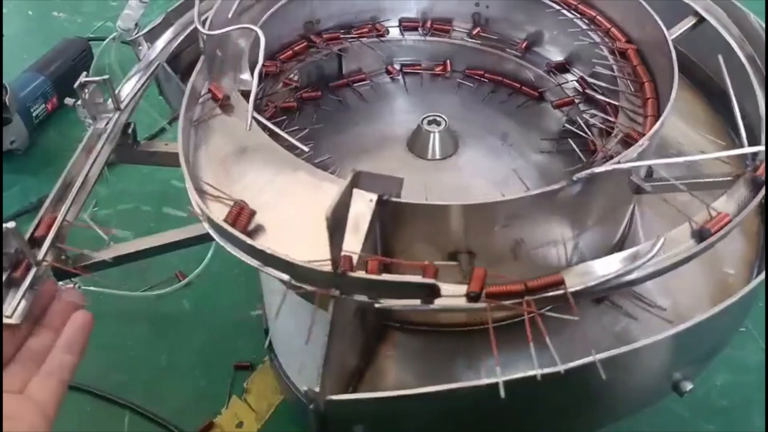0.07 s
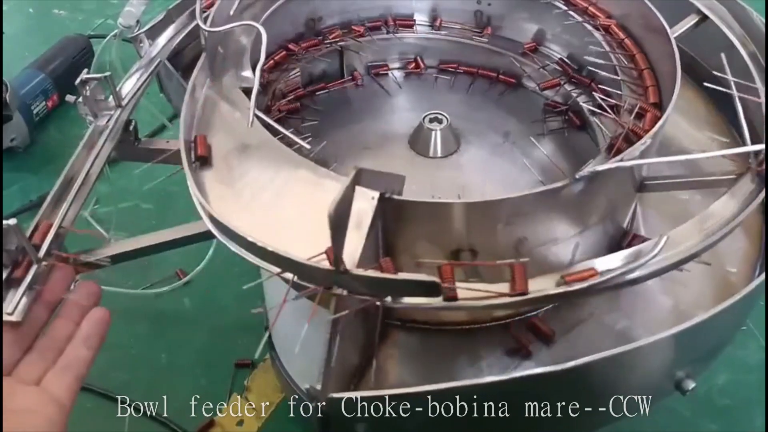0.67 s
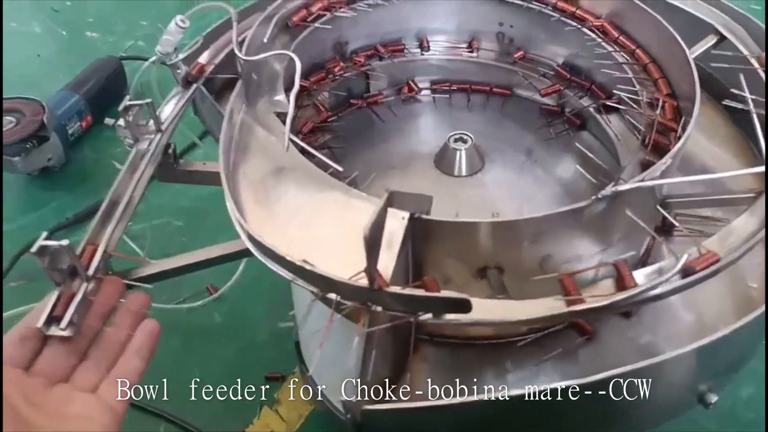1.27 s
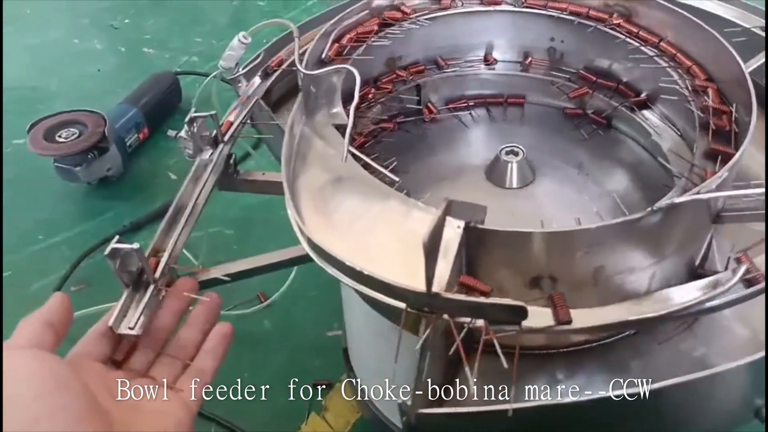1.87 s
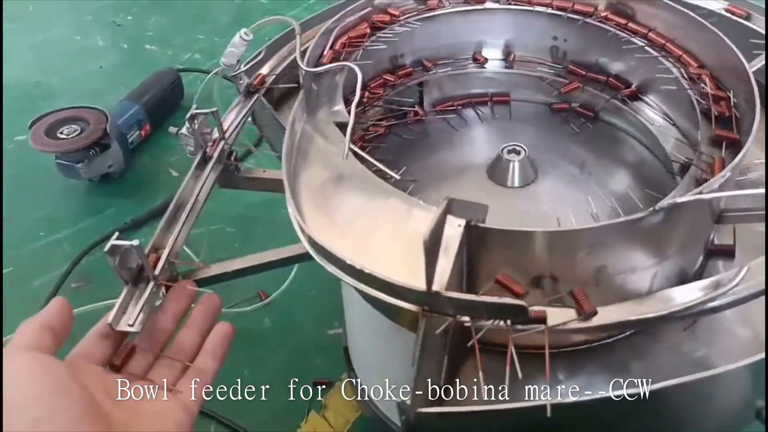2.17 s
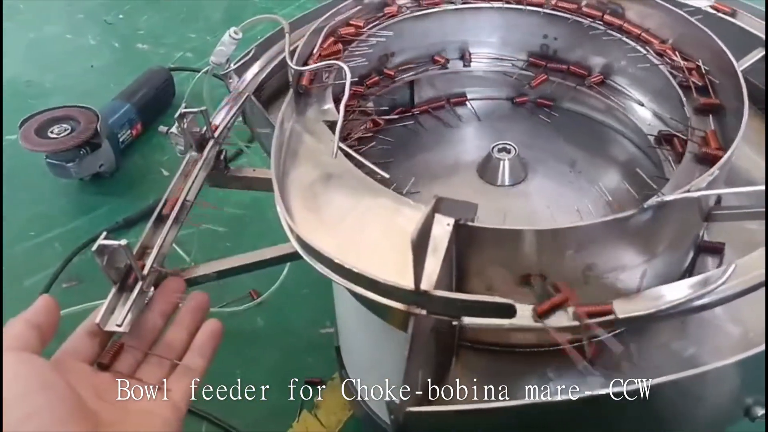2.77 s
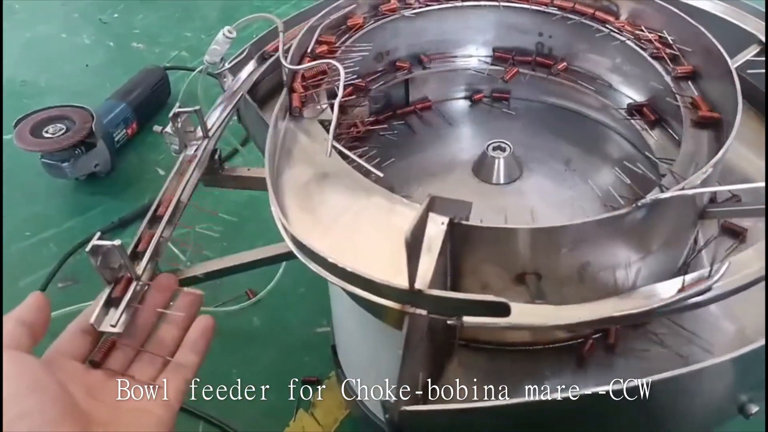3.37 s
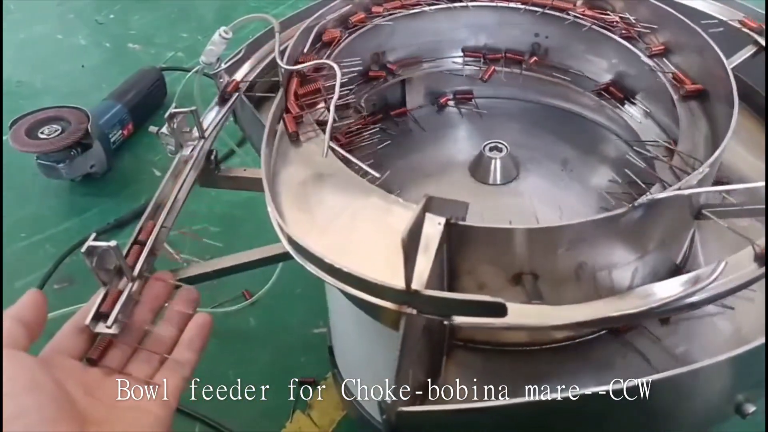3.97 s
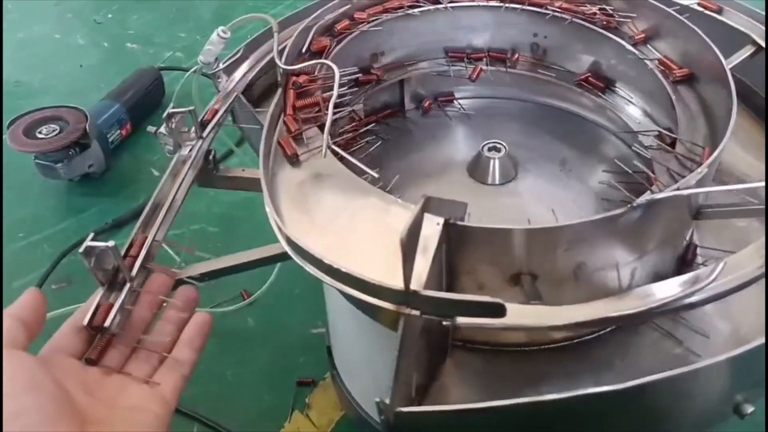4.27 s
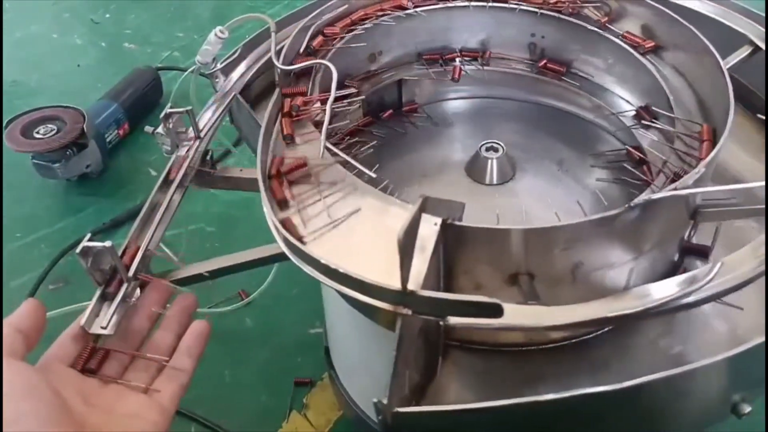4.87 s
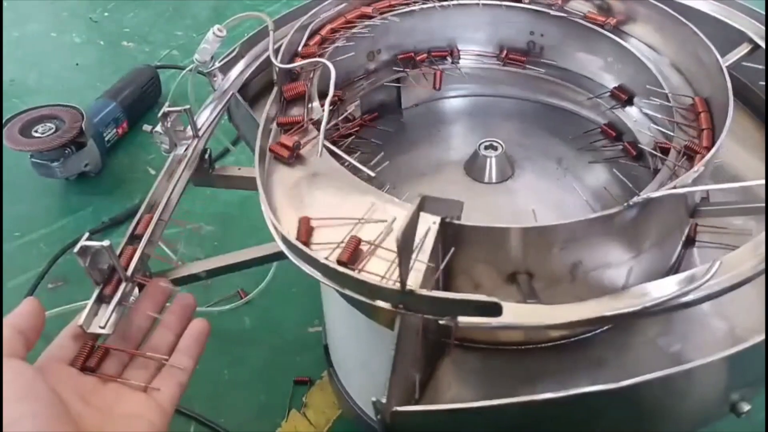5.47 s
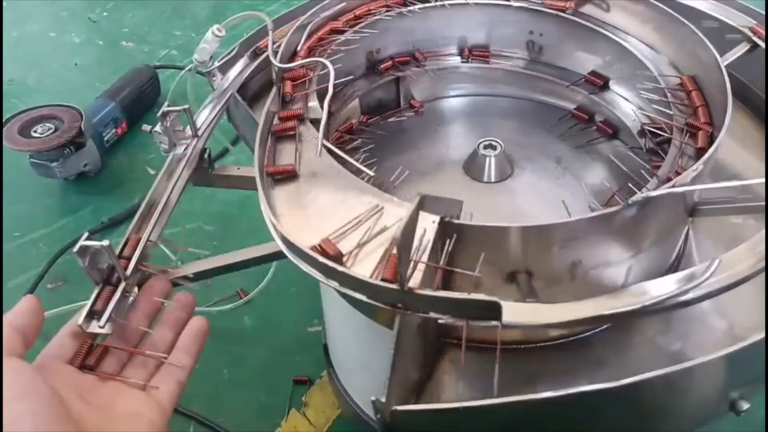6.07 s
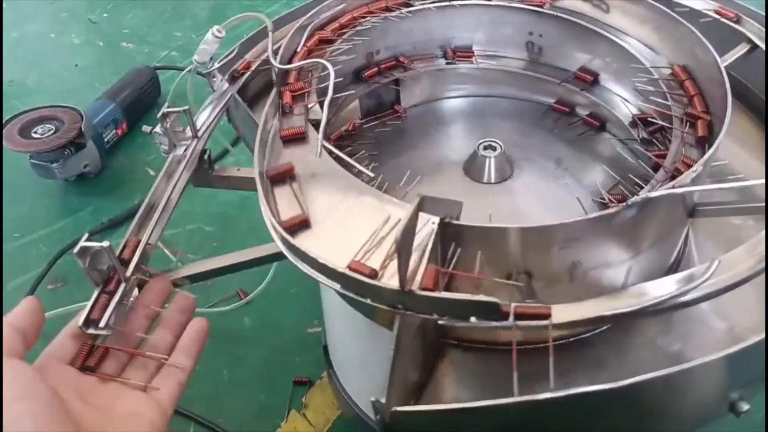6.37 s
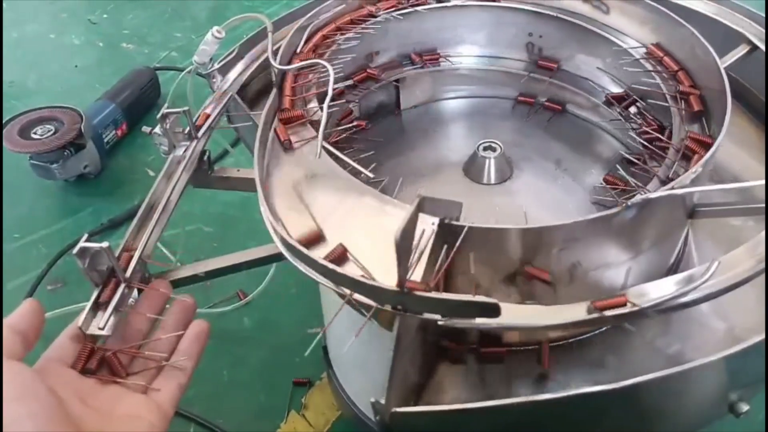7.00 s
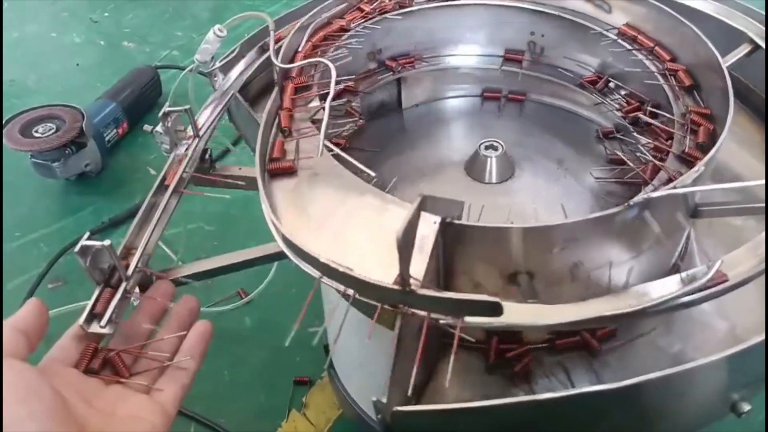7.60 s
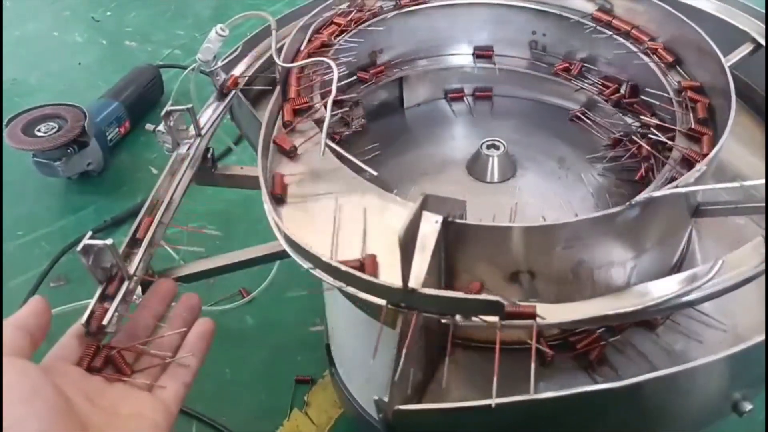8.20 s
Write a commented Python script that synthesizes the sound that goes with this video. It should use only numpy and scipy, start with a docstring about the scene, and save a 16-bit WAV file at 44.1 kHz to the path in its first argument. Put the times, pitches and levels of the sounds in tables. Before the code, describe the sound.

Close to a workshop feeder, many small metal coils chatter continuously around a shaking steel bowl, with thin high tones ringing out and a low motor hum underneath. Scattered clinks and soft knocks mark falling parts, bunching together about three seconds in. A soft hollow tone then rises and fades, and more clinks follow. The rattle often thins for an instant but keeps going.

```python
"""A vibrating bowl feeder rattles small wire-legged coils in a workshop, heard from just above its rim.
The humming drive tosses the coils once a cycle, and their landings ring the steel bowl into a dense,
bright rattle in which a few tones sing out. Now and then a coil drops off the track with a clink or
knocks on the wall. Midway a hollow drone swells. The sound often thins for an instant."""
import sys
import numpy as np
from scipy import signal
from scipy.fft import rfft, irfft, next_fast_len
from scipy.io import wavfile
from scipy.ndimage import uniform_filter1d

SR = 44100
rng = np.random.default_rng(int(sys.argv[2]) if len(sys.argv) > 2 else 0)


def store_pcm(level_fs):
    """Save levels as 16-bit WAV."""
    pcm = np.round(np.clip(level_fs, -1, 1) * 32767).astype(np.int16)
    wavfile.write(sys.argv[1], SR, np.atleast_2d(pcm).T)


N = 363384
T = np.arange(N) / SR
DRIVE_HZ = 111.26  # how often the bowl shakes

# how hard the coils jostle over time: time_s, level_db, extra_treble_db, extra_boom_db
JOSTLING = [(0.1, -21, 3.5, 0), (0.5, -18.5, 0.5, -2.5), (0.9, -20, 2, -1.5), (1.2, -19, 0.5, -0.5),
            (2.0, -20.5, -0.4, -1), (2.7, -19.5, -0.7, -1.5), (3.3, -21.5, 3.5, 1.5),
            (4.1, -18, -0.5, -1.5), (4.6, -21, 2.5, 1.5), (5.3, -19.5, 1.5, -1), (6.0, -20.5, 2, 0.5),
            (6.4, -18.5, 2, -1), (6.6, -20, 3, 1.5), (7.0, -19, 0.5, -0.5), (7.7, -18.5, 1, -1.5),
            (7.9, -19.5, -0.5, -3), (8.2, -19, 2, 0)]
# ringing tones of the bowl and its track, plus two faint low hum tones at 200 and 222 Hz:
# pitch_hz, nominal_width_hz, relative_db
RING_AND_HUM_TONES = [(200, 8, -52), (222, 8, -55), (412, 19, -36.8), (460, 9, -50), (654, 16, -44.8),
                      (900, 26, -46.1), (1255, 22, -45.3), (1463, 22, -45.6), (1610, 28, -42.5),
                      (1762, 36, -41.3), (1865, 40, -45), (2060, 24, -42), (2155, 20, -44.5),
                      (2336, 14, -42.5), (2575, 11, -35.3), (2636, 20, -36.8), (2840, 30, -41),
                      (2905, 18, -42.1), (3059, 17, -34.2), (3185, 25, -41), (3305, 25, -40.5),
                      (3378, 16, -39.5), (3594, 18, -38.3), (3745, 45, -35.8), (3808, 45, -35.3),
                      (3873, 40, -39), (3935, 19, -33.3), (3972, 22, -38.5), (4131, 8, -42.5),
                      (4340, 30, -42), (4393, 32, -39.8), (4440, 25, -41), (4530, 15, -46),
                      (4655, 20, -46.5), (5112, 31, -45.0), (5570, 30, -49.5), (5880, 36, -46.5),
                      (6445, 189, -41), (8473, 44, -44), (9084, 137, -45.9), (10222, 60, -40),
                      (10945, 60, -39), (11130, 150, -37), (11552, 115, -35.3), (11865, 400, -35.3),
                      (14649, 64, -50)]
# tone colour of the steel's many weaker modes (natural tones): frequency_hz, relative_db
WEAK_MODE_COLOUR = [(25, -79), (60, -75), (125, -63.5), (170, -72), (330, -63.5), (560, -72), (790, -71),
                    (1060, -68), (1800, -65.5), (2250, -65), (2750, -57.5), (3400, -59), (4600, -63),
                    (7200, -69.5), (12000, -68), (15000, -73.5)]
# modes that sing out for a while: peak_time_s, half_length_s, pitch_hz, nominal_width_hz, level_db
SINGING_MODES = [(.5, 0.3, 10222, 34, -36), (.96, 0.08, 10222, 34, -33.5), (1.33, .11, 4395, 18, -34),
                 (5.3, .09, 2573, 7, -30.5), (5.7, .16, 2576, 7, -36), (6.3, 1.5, 10260, 110, -42)]
# coils that drop off the track: start_s, peak_db, pitch_hz, extra_treble_db, track_relative_db
COIL_DROPS = [(0.5661, -9, 4130, 1, -12), (1.134, -11.5, 4150, 0, -12), (2.634, -4.3, 4120, 0, -12),
              (2.7911, -9, 4100, -4, -10), (2.9048, -6, 4400, 2, -14), (2.952, -11.5, 4130, 0, -14),
              (2.9754, -7, 4480, 4, -14), (3.2335, -5, 4530, 0, -12), (4.2757, -7.5, 4340, 7, -14),
              (4.49, -11, 4130, 2, -14), (5.5762, -12, 6670, 4, -12), (6.4117, -11, 4400, 4, -12),
              (6.94, -12, 5120, 1, 4.5), (7.4418, -6.5, 5100, 0, -14), (7.456, -6, 4130, -1, -12)]
# tone colour of a hard hit on the steel: frequency_hz, relative_db
CLINK_COLOUR = [(150, 1), (700, -8), (1500, -5.5), (2800, 8), (4500, 6), (6200, 7.5), (7600, -4), (9300, 6),
                (10500, 8.5), (12000, 7), (15000, -3)]
# modes of the thin track when a coil hits its edge: pitch_hz, relative_db, ring_time_s
TRACK_MODES = [(666, -9, .07), (1287, -3, .07), (1620, -3, .07), (3060, -3, .08), (4124, -1, .1),
               (5120, -2, .08), (5889, -3, .08), (6083, -5, .08), (6772, -6, .09), (8985, -7, .09),
               (10230, -5, .09), (11490, -1, .08)]
# coil bodies bumping the wall: start_s, peak_db, pitch_hz
WALL_KNOCKS = [(1.204, -23, 1570), (1.388, -23, 1350), (2.976, -17, 1570), (3.233, -21, 880),
               (4.275, -26, 630), (4.528, -24, 1010), (4.799, -28, 820), (5.213, -24, 920),
               (5.765, -19.5, 876), (7.309, -22, 1150), (7.456, -20, 2040)]
# tone colour of a dull knock: frequency_hz, relative_db
KNOCK_COLOUR = [(80, -8), (250, -8), (800, -4), (1700, -4), (3000, -6), (12000, -40)]
# tones of the hollow drone: peak_time_s, half_length_s, pitch_hz, nominal_width_hz, level_db
DRONE_TONES = [(4.52, 0.32, 339, 37, -36), (4.44, 0.093, 736, 25, -35), (4.06, 0.077, 785, 31, -41),
               (5.3, 0.16, 282, 40, -43)]
# instants when the sound thins: middle_s, length_s, depth_db
BRIEF_DIPS = [(.361, .014, -9), (.4, .028, -8), (.549, .012, -7), (.65, .015, -7), (.737, .012, -6),
              (.783, .046, -45), (1.083, .018, -9), (1.112, .02, -5), (1.295, .014, -11),
              (1.659, .015, -13), (1.891, .012, -10), (1.956, .013, -14), (1.998, .014, -15),
              (2.075, .026, -36), (2.253, .048, -14), (2.363, .013, -13), (2.554, .013, -11),
              (2.724, .017, -13), (3.023, .012, -10), (3.13, .022, -12), (3.224, .016, -4),
              (3.27, .026, -32), (3.315, .01, -7), (3.577, .015, -11), (3.749, .046, -45),
              (4.048, .013, -7), (4.132, .014, -12), (4.624, .017, -14), (4.664, .02, -14),
              (4.793, .013, -10), (4.885, .014, -5), (5.037, .022, -6), (5.396, .016, -6),
              (5.616, .018, -7), (6.044, .017, -6), (6.284, .014, -11), (6.539, .026, -6), (6.985, .05, -4),
              (7.257, .044, -17), (7.58, .02, -6), (7.8, .015, -13), (7.93, .019, -13), (7.972, .011, -8),
              (7.993, .011, -9), (8.037, .014, -13), (8.186, .019, -8)]


def bowl_rattle(heap_count=10):
    """Heaps of coils ring the bowl, each at its own spot; two faint low hum tones lie underneath."""
    heaps = np.array([landings() + undb(-6.5) * tumbles() for _ in range(heap_count)])
    clatter = sum(signal.oaconvolve(heap, steel_strike(ring_s=.06, tick=.54))[:N] for heap in heaps)
    out = undb(-23) * unit(colour(clatter, WEAK_MODE_COLOUR))
    for hz, width, db in RING_AND_HUM_TONES:
        # each tone gets its own mix of the heaps
        push = rng.standard_normal(heap_count) @ heaps
        ring = unit(resonate(push, hz, .85 * width))
        # a wide swing throws the coils clear, which keeps the bowl's ring fairly even
        swing = np.sqrt(uniform_filter1d(ring ** 2, SR // 6) + .01)
        # each tone comes and goes a little
        drift = undb(1.5 * wander(rate_hz=9))
        out += undb(db - .95) * unit(drift * ring / np.sqrt(swing))
    return out


def landings(coils=6, scatter_cycles=.29, uneven_db=5.5, shift_db=1.5):
    """Each coil in a shifting heap lands once a drive cycle, early or late, hard or soft."""
    cycle = np.arange(int(N / SR * DRIVE_HZ))[:, None]
    late, force = rng.standard_normal((2, len(cycle), coils))
    at = ((cycle + scatter_cycles * late) / DRIVE_HZ * SR).astype(int) % N
    push = undb(uneven_db * np.clip(force, -2, 2)) * rng.choice([-1, 1], force.shape)
    taps = np.bincount(at.ravel(), push.ravel(), N)
    return unit(taps * undb(shift_db * wander(rate_hz=30)))


def tumbles(count=45):
    """Now and then a coil tips over, lands hard and bounces on for two more drive cycles."""
    out = np.zeros(N + SR)
    for when, force in rng.random((count, 2)):
        for bounce in range(3):
            out[int(when * N + bounce * SR / DRIVE_HZ)] += undb(6 * force - 2 * bounce)
    return unit(out[:N])


def jostle(rattle):
    """How hard the coils jostle sets the level; wire legs add treble, heavy bodies add boom."""
    level_db, legs_db, boom_db = curves(JOSTLING)
    legs, boom = band(rattle, 5900, "high"), band(rattle, 1700, "low")
    # few bodies reach the wall at a time, so the boom comes in lumps
    lumps_db = boom_db + wander(rate_hz=26)
    jingle_db = legs_db + .5 * wander(rate_hz=35)
    shaped = rattle + legs * (undb(jingle_db) - 1) + boom * (undb(lumps_db) - 1)
    return unit(shaped) * undb(level_db)


def falling_coils():
    """Falling coils clink brightly and ring the track; their bodies knock dully on the wall."""
    clinks = [(s, db, hz, treble_db) for s, db, hz, treble_db, _ in COIL_DROPS]
    knocks = [(s, db, hz, 0) for s, db, hz in WALL_KNOCKS]
    return hits(clinks, CLINK_COLOUR, ring_db=-9) + track_ring() + hits(knocks, KNOCK_COLOUR, ring_db=-6)


def hits(table, tone_colour, ring_db):
    """For each row, a coil hits the steel and bounces once, more softly."""
    out = np.zeros(N + SR)
    lead = 256  # samples of room for the filters ahead of the hit
    for start_s, peak_db, hz, treble_db in table:
        hit = np.zeros(SR // 3)
        for delay_s, gain in [(0, 1), (rng.uniform(.0022, .007), .55)]:
            ring = steel_strike(ring_s=.11, tick=.065)
            at = lead + int(delay_s * SR)
            hit[at:at + len(ring)] += gain * ring
        hit = unit(colour(hit, tone_colour))
        # the struck spot rings at its own pitch and one out-of-tune overtone
        hit += undb(ring_db) * (unit(resonate(hit, hz, 31)) + .5 * unit(resonate(hit, 1.9 * hz, 82)))
        hit += band(hit, 12000, "high") * (undb(treble_db) - 1)
        at = int(start_s * SR) - lead
        out[at:at + len(hit)] += hit * undb(peak_db) / np.abs(hit).max()
    return out[:N]


def steel_strike(ring_s, tick, size=8192):
    """Struck steel gives a tick, then countless modes fade together, by 60 dB in ring_s."""
    decay = undb(-60 * T[:size] / ring_s)
    ring = rng.standard_normal(size) * decay
    ring /= np.linalg.norm(ring)
    ring[0] += tick
    return ring / np.linalg.norm(ring)


def track_ring(rise_s=.009):
    """Each falling coil sets the thin track ringing in a few clear tones."""
    age = T[:SR // 3]
    ring = sum(undb(db - 60 * age / ring_s) * np.sin(2 * np.pi * (hz * age + rng.random()))
               for hz, db, ring_s in TRACK_MODES)
    ring *= np.minimum(age / rise_s, 1)
    blows = np.zeros(N)
    for start_s, peak_db, _, _, track_db in COIL_DROPS:
        blows[int(start_s * SR)] = undb(peak_db + track_db)
    return signal.oaconvolve(blows, ring / np.abs(ring).max())[:N]


def swelling_tones(table):
    """Narrow resonances, driven fairly evenly by noise, rise and fade."""
    out = 0
    for peak_s, half_length_s, hz, width, db in table:
        tone = resonate(rng.standard_normal(N), hz, 1.6 * width)
        tone = resonate(tone, hz, 1.6 * width)  # a second pass makes it purer
        loudness = np.sqrt(uniform_filter1d(unit(tone) ** 2, SR // 8) + .05)
        swell = np.exp(-.5 * ((T - peak_s) / half_length_s) ** 2)
        out += undb(db) * swell * unit(tone / loudness)
    return out


def drive_hum(level_db=-34, octave_relative_db=-35):
    """The bowl swings on its springs, making an almost pure tone with a faint octave above."""
    phase = 2 * np.pi * DRIVE_HZ * T + .03 * wander(rate_hz=10)
    tone = np.sin(phase) + undb(octave_relative_db) * np.sin(2 * phase)
    return undb(level_db + .15 * wander(rate_hz=6.5)) * tone


def suppress_noise(x, strength=.22):
    """A mild noise suppressor favours tones that stand above their neighbours in pitch."""
    def rule(power):
        neighbours = np.abs(uniform_filter1d(power, 25, axis=0))
        gain = (power / neighbours) ** strength
        return gain * np.sqrt(power.sum(0) / (power * gain ** 2).sum(0))  # same total power
    return scale_tones(x, rule)


def thin_briefly(x, stand_out_db=4.4, lift_db=2, neighbour_share=.3):
    """The sound dips for an instant, except for its clearest tones, which get a small lift."""
    def rule(power):
        lasting = np.abs(uniform_filter1d(power, 5, axis=1)) + 1e-18
        neighbours = np.abs(uniform_filter1d(lasting, 41, axis=0))
        # a tone stays if it stands above a blend of its neighbours and the whole sound
        usual = neighbours ** neighbour_share * lasting.mean(0) ** (1 - neighbour_share)
        threshold = undb(stand_out_db) ** 2 * usual
        return undb(lift_db) / (1 + (threshold / lasting) ** 8)
    dip_db = 0
    for middle_s, length_s, depth_db in BRIEF_DIPS:
        distance = np.minimum(2 * np.abs(T - middle_s) / length_s, 2)
        dip_db += depth_db * np.exp(-distance ** 4)
    untouched = undb(dip_db)
    return x * untouched + scale_tones(x, rule) * (1 - untouched)


def scale_tones(x, rule):
    """Turn each frequency above 250 Hz up or down, moment by moment, by a rule on its power."""
    hz, _, spectrum = signal.stft(x, SR, nperseg=1024, noverlap=768)
    gain = np.where(hz[:, None] > 250, rule(np.abs(spectrum) ** 2 + 1e-18), 1)
    return signal.istft(spectrum * gain, SR, nperseg=1024, noverlap=768)[1][:N]


def resonate(x, hz, width_hz):
    """Ring at one pitch; the narrower the width, the longer it rings."""
    return signal.lfilter(*signal.iirpeak(hz, hz / width_hz, fs=SR), x + 1e-18)


def colour(x, points):
    """Shape the tone with a curve through (frequency_hz, relative_db) points."""
    hz, db = np.transpose(points)
    size = next_fast_len(len(x))
    frequencies = np.maximum(np.fft.rfftfreq(size, 1 / SR), 1)
    gain = undb(np.interp(np.log(frequencies), np.log(hz), db))
    return irfft(rfft(x, size) * gain, size)[:len(x)]


def band(x, hz, kind):
    """Gently keep the "low" or "high" side of a frequency, without delay."""
    return signal.sosfiltfilt(signal.butter(2, hz, kind, fs=SR, output="sos"), x)


def wander(rate_hz):
    """A smooth random drift with a typical size of one."""
    step = int(SR / rate_hz)
    held = rng.standard_normal(2000)[np.arange(N) // step % 2000]
    return unit(uniform_filter1d(held, step))


def curves(table):
    """Join the rows of a time table with straight lines, one value a sample."""
    times, *columns = np.transpose(table)
    return [np.interp(T, times, column) for column in columns]


def unit(x):
    """Scale to an average (rms) level of one."""
    return x / np.sqrt(np.mean(x ** 2))


def undb(db):
    """Turn decibels into a gain."""
    return 10 ** (np.asarray(db) / 20)


def scene():
    """The whole machine, the same in both ears."""
    bowl = jostle(bowl_rattle()) + swelling_tones(SINGING_MODES)
    mono = bowl + falling_coils() + drive_hum() + swelling_tones(DRONE_TONES)
    return np.array([mono, mono])


def record(dry, start_s=.081, fade_s=.033, top_hz=15100):
    """One microphone: noise is eased, the sound thins at times, fades in fast and loses its very top."""
    fade_in = np.clip((T - start_s) / fade_s, .03, 1) ** 2
    mono = thin_briefly(suppress_noise(dry.mean(0))) * fade_in
    top_cut = signal.ellip(10, .2, 80, top_hz, fs=SR, output="sos")
    return signal.sosfilt(top_cut, np.array([mono, mono]))


dry = scene()
out = record(dry)
store_pcm(out)
```